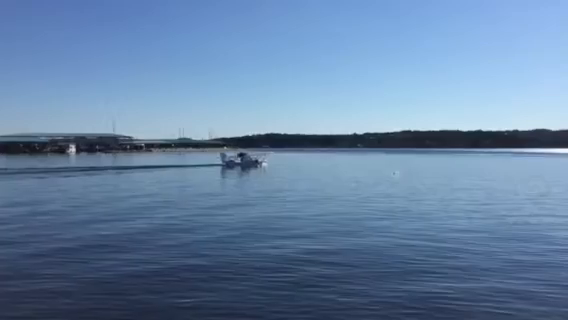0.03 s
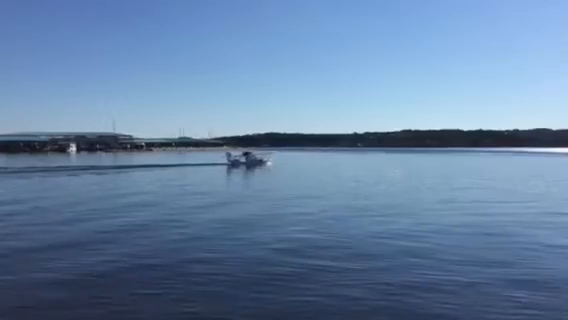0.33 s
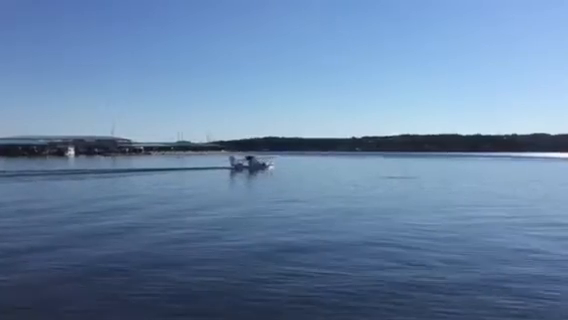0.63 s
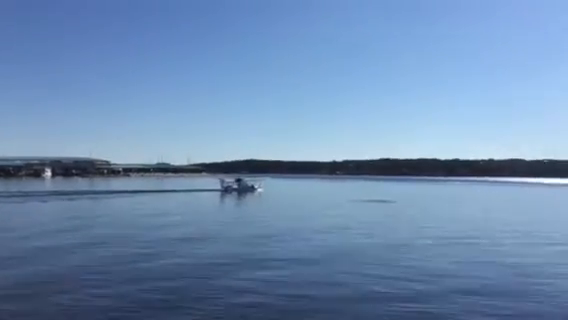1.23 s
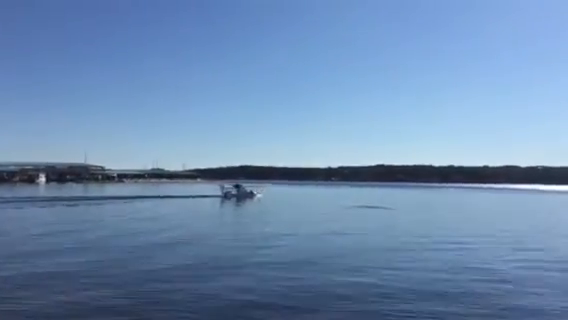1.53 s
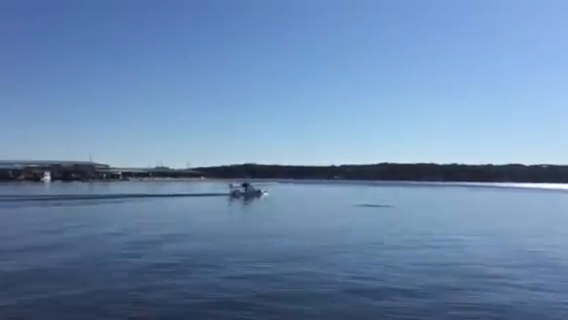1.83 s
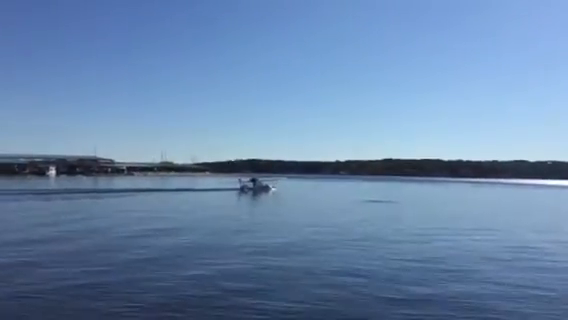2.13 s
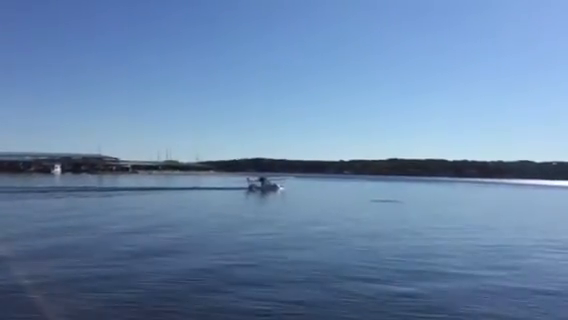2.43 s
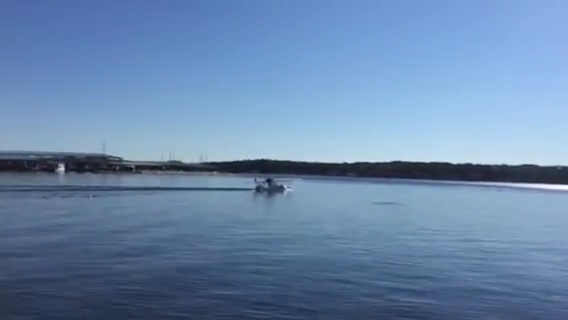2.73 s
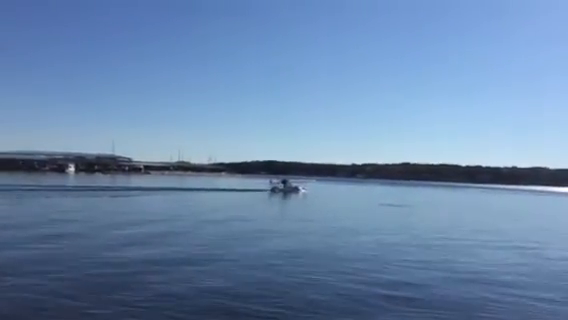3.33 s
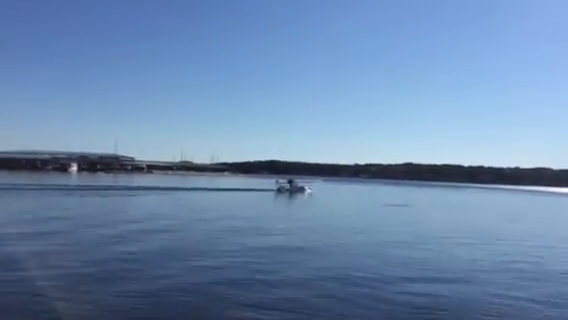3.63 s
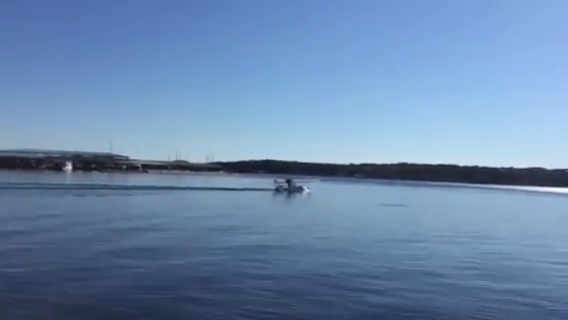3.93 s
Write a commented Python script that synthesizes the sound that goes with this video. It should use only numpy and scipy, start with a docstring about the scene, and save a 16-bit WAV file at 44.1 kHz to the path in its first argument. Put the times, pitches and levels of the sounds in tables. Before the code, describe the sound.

A distant seaplane taxis on open water for the whole four seconds, its low engine drone and raspy propeller buzz holding one pitch, with a faint metallic ring above. The buzz wavers in the air, swelling briefly near 0.9 seconds. Faint wind and water hiss continue underneath. Tiny nearby ticks come at about 0.2, 1.2 and 1.9 seconds, and soft low thuds around 0.9, 1.8 and 3.5 seconds.

```python
"""Seaplane on a lake

A small seaplane taxis far off at a steady speed. Its geared three-blade propeller snaps 48 times a
second, fading in and out through the moving air; the four-cylinder engine drones below it and its metal
parts ring above. Faint wind and water hiss lie underneath, with a few tiny ticks and soft thuds nearby."""
import sys
import numpy as np
from scipy import signal
from scipy.fft import rfft, irfft, next_fast_len
from scipy.io import wavfile
from scipy.ndimage import uniform_filter1d, map_coordinates

SR = 44100
rng = np.random.default_rng(int(sys.argv[2]) if len(sys.argv) > 2 else 0)


def digitize_waveform(pressure):
    """Quantize a signal to 16-bit integers and store it at the path in sys.argv[1].

    Rows of a 2-D input are taken as channels; values are limited to [-1, 1].
    """
    field = np.atleast_2d(pressure).T
    bounded = np.clip(field, -1, 1)
    quanta = np.round(bounded * 32767).astype(np.int16)
    wavfile.write(sys.argv[1], SR, quanta)


N = 176400
T = np.arange(N) / SR


def amp(db):
    """Decibels to amplitude ratio."""
    return 10 ** (np.asarray(db) / 20)


def unit(x):
    """Normalise to rms 1."""
    return x / np.sqrt(np.mean(x ** 2) + 1e-20)


def along(points, hz):
    """Interpolate (f/Hz, value) points on a logarithmic frequency axis."""
    f, v = np.transpose(points)
    return np.interp(np.log(hz + 1), np.log(f + 1), v)


def curves(rows):
    """Interpolate each column after t/s to one value per sample."""
    s, *cols = np.transpose(rows)
    return [np.interp(T, s, c) for c in cols]


def wobble(rate):
    """Smooth random modulation, rate knots a second."""
    return map_coordinates(rng.standard_normal(400), [T * rate + 2], mode="wrap")


def filtered(x, response):
    """Linear filtering: multiply the spectrum by a frequency response."""
    m = next_fast_len(N + SR // 2)
    return irfft(rfft(x, m) * response(np.fft.rfftfreq(m, 1 / SR)), m)[:N]


def coloured(x, spectrum):
    """Spectral shaping by (f/Hz, relative level/dB) points, at rms 1."""
    return unit(filtered(x, lambda hz: amp(along(spectrum, hz))))


def patchy(x, depth_db):
    """Random modulation: neighbouring frequencies swell and fade together."""
    spectra = signal.stft(x, nperseg=1024)[2]
    field = uniform_filter1d(rng.standard_normal(spectra.shape), size=5, axis=0)
    field = uniform_filter1d(field, size=9, axis=1)
    return signal.istft(spectra * amp(depth_db * unit(field)), nperseg=1024)[1][:N]


def passes(phase):
    """Times at which a phase completes a cycle."""
    return np.interp(np.arange(np.ceil(phase[0]), phase[-1]), phase, T)


def pulses(times, sizes):
    """A train of single-sample impulses."""
    return np.bincount(np.clip(np.round(times * SR).astype(int), 0, N - 1), sizes, N)


def tones(phase, table, waver_db, rate):
    """Harmonic series: partials crest loosely together, each wavering in level."""
    return sum(np.sqrt(2) * amp(db + waver_db * wobble(rate))
               * np.cos(2 * np.pi * (round(k) * phase + rng.normal(0, .17))) for k, db in table)


def blade_snaps(blade, spectrum):
    """Multipath: each blade's pulse arrives directly, off the water and as a later reflection."""
    times = passes(blade)
    jitter, scatter = rng.standard_normal((len(times), 2)).T
    times, sizes = times + .00005 * jitter, -amp(1.1 * scatter)
    bounce_s = .001 * (1 + .42 * np.interp(times, T, wobble(5)))
    echo_s = .0094 + .00015 * np.interp(times, T, wobble(4.4))
    reflections = pulses(times + bounce_s, .4 * sizes) + pulses(times + echo_s, .25 * sizes)
    snaps = coloured(pulses(times, sizes) + reflections, spectrum)
    smear_s_per_khz = .0013  # each snap becomes a short falling chirp
    return filtered(snaps, lambda hz: np.exp(1j * np.pi * smear_s_per_khz * (hz - 1000) ** 2 / 1000))


def blade_swish(blade, spectrum, decay_s=.0025):
    """Turbulence: the noise of torn air peaks at each blade passage."""
    from_blade_s = (blade - np.round(blade)) / (np.gradient(blade) * SR)
    return coloured(rng.standard_normal(N) * np.exp(-abs(from_blade_s) / decay_s), spectrum)


def fading(sound, depth=.9):
    """Atmospheric scintillation: moving air makes three bands fade separately."""
    # fading, scaled by depth (t/s, low level/dB, middle level/dB, high level/dB)
    band_levels = [(0.0, 2.0, -1.2, -0.3), (0.1, -4.4, -0.3, -1.3), (0.15, 1.6, -0.7, -1.2),
                   (0.31, -5.7, -2.9, -3.5), (0.48, 1.1, -2.6, -3.1), (0.56, -5.5, -1.2, -1.3),
                   (0.64, -1.3, 1.1, -2.6), (0.69, -1.4, -3.4, 0.8), (0.81, 2.5, 1.5, -2.8),
                   (0.85, -1.8, -2.8, 2.1), (0.89, 0.6, 5.6, 6.5), (0.98, -1.8, 3.4, -0.1),
                   (1.14, 2.9, -0.8, 0.3), (1.19, 4.5, 2.9, -1.3), (1.27, -1.3, -4.4, -0.0),
                   (1.44, 3.6, 2.4, -0.1), (1.52, -1.6, 0.1, -2.4), (1.64, 5.1, 2.8, -2.1),
                   (1.77, -0.7, -4.7, 0.0), (1.93, 3.4, 0.8, -0.3), (2.06, -0.7, -2.1, 2.0),
                   (2.1, -7.6, -2.9, 0.7), (2.35, 3.0, -0.8, 1.3), (2.39, 0.1, 2.0, 0.1),
                   (2.43, -2.5, -2.9, -3.8), (2.85, 0.5, 4.2, 2.9), (3.02, -2.0, -3.5, -0.1),
                   (3.1, 5.6, 1.5, -0.6), (3.27, -6.6, -4.5, -1.7), (3.35, -3.5, 4.5, 1.8),
                   (3.39, -2.8, -0.3, 4.1), (3.6, -1.7, 0.4, -2.4), (3.77, -2.1, -6.9, 0.2),
                   (3.81, 1.8, -1.7, -1.3), (3.89, -4.0, -5.0, -1.4), (4.0, -0.8, 6.0, -4.4)]
    low = filtered(sound, lambda hz: along([(650, 1), (900, 0)], hz))
    high = filtered(sound, lambda hz: along([(1250, 0), (1550, 1)], hz))
    bands = [low, sound - low - high, high]
    return sum(band * amp(depth * db) for band, db in zip(bands, curves(band_levels)))


def shore(x, t60_s=.45):
    """Reverberation: diffuse scatter from the water and the far shore decays exponentially."""
    tail = rng.standard_normal(SR) * amp(-60 * T[:SR] / t60_s)
    lead_in = x[:SR][::-1]  # the scatter is already sounding at the start
    return signal.fftconvolve(np.concatenate([lead_in, x]), tail / np.linalg.norm(tail))[SR:SR + N]


def propeller(turns, blades=3, gear_ratio=2.43):
    """Rotor noise: snaps, swish and hum repeat at the blade-passage frequency over a broadband wash."""
    # spectrum of a blade passage (f/Hz, relative level/dB)
    blade_spectrum = [(200, -26), (290, -1), (335, 2), (430, 0.5), (530, 4.5), (680, 3), (790, -9.5),
                      (900, 2.5), (1080, 3.5), (1380, -7.5), (1650, -2.5), (1850, -12), (2100, -13.5),
                      (2350, -24), (4000, -33), (8000, -60)]
    # spectrum of the steady wash (f/Hz, relative level/dB)
    wash_spectrum = [(20, -20), (200, -6), (400, -11), (600, -2), (800, -6), (1100, -0.5), (1400, -6.5),
                     (1650, -4), (1900, -14), (2100, -11), (2350, -26), (4000, -31), (8000, -70)]
    # hum partials (multiple of the blade rate, level/dB)
    hum_partials = [(1, -51.5), (2, -46), (3, -46), (4, -51), (5, -50), (6, -56), (7, -53)]
    blade = (turns - np.interp(.001, T, turns)) * blades / gear_ratio  # a blade passes at 1 ms
    snaps = amp(-41.5) * blade_snaps(blade, blade_spectrum)
    swish = amp(-50) * blade_swish(blade, blade_spectrum)
    wash = amp(-47.5) * coloured(rng.standard_normal(N), wash_spectrum)
    faded = fading(patchy(snaps + swish + wash, depth_db=1))
    scattered = amp(-9) * shore(faded)
    hum = -tones(blade - .03, hum_partials, waver_db=1.1, rate=3)  # lags by .03 blade periods
    return faded + scattered + hum


def ringing(turns, pattern_db, modes, repeat, decay_s=.012):
    """Resonance: two firings a turn rattle metal modes; a share, repeat, recurs each engine cycle."""
    times = passes(2 * turns)
    firings = pulses(times, amp(np.resize(pattern_db, len(times))))
    knocks = signal.fftconvolve(firings, np.exp(-T[:SR // 10] / decay_s))[:N]
    cycle_noise = rng.standard_normal(int(2 * N / turns[-1]))
    periodic = cycle_noise[(turns / 2 % 1 * len(cycle_noise)).astype(int)]
    rattle = knocks * (np.sqrt(repeat) * periodic + np.sqrt(1 - repeat) * rng.standard_normal(N))
    return unit(filtered(rattle, lambda hz: sum(
        amp(db) / (1 + (2 * (hz - centre) / width) ** 2) for centre, width, db in modes)))


def metal_parts(turns):
    """Structure-borne sound: firings ring the engine case and gears, and the gears whine."""
    # resonances (f/Hz, bandwidth/Hz, relative level/dB)
    case_modes = [(2575, 133, -7.5), (3141, 320, -0.5), (3300, 61, -7.5)]
    gear_modes = [(4065, 160, -5), (4270, 210, -21)]
    # knock at each firing (relative level/dB)
    case_knocks = [-9.5, -7, -11.5, -8.5]  # by cylinder
    gear_knocks = [1, -24, 1.5, -3.5, -2, -5.5, -1, -2.5]  # over two engine cycles
    # drift of the ringing (t/s, case level/dB, gear level/dB)
    ring_levels = [(0.0, 0.2, -1.0), (2.0, 1.9, -0.1), (2.16, -1.9, -0.8), (2.4, -0.8, 1.9),
                   (2.92, -0.6, 0.3), (3.4, -0.7, 2.7), (3.48, -1.6, -0.4), (4.0, -2.4, -0.7)]
    # gear whine (multiple of the crankshaft speed, level/dB)
    whine_partials = [(82, -61), (88, -68), (104, -66)]
    case_db, gear_db = curves(ring_levels)
    case = amp(-53.5 + case_db) * ringing(turns, case_knocks, case_modes, repeat=.5)
    gears = amp(-60 + gear_db) * ringing(turns, gear_knocks, gear_modes, repeat=.55)
    whine = amp(case_db) * tones(turns + .0012 * wobble(25), whine_partials, waver_db=3, rate=14)
    return case + gears + whine


def exhaust(turns, first_puff_s=.0056):
    """Periodic flow: exhaust puffs drone at harmonics of the two-turn engine cycle."""
    # drone partials (multiple of the cycle rate, level/dB)
    partials = [(4, -39.5), (5, -55), (6, -55.5), (7, -46.5), (8, -43), (9, -49), (10, -55), (11, -59),
                (12, -46), (13, -63), (16, -61), (24, -66)]
    # drift of the drone (t/s, relative level/dB)
    drone_level = [(0, 1.5), (.65, 1.5), (.95, -1), (4, 0.5)]
    cycle = (turns - np.interp(first_puff_s, T, turns)) / 2
    return amp(curves(drone_level)[0]) * tones(cycle, partials, waver_db=.5, rate=4)


def wind():
    """Broadband noise of wind and far water, amplitude-modulated by slight gusts."""
    # noise spectrum (f/Hz, relative level/dB)
    spectrum = [(15, -17), (35, -13), (70, -4), (150, 2.5), (250, -5.5), (400, -13.5), (900, -9),
                (1600, -18), (2300, -24), (3600, -21), (4800, -62), (9000, -65)]
    air = coloured(patchy(rng.standard_normal(N), depth_db=1.2), spectrum)
    return air * amp(-45.5 + .6 * wobble(4.2))


def water_hiss(fall_db_per_s=.84):
    """High-frequency noise of the water in slow exponential decay."""
    # noise spectrum (f/Hz, relative level/dB)
    spectrum = [(1500, -16), (3500, 11.5), (4800, -1.5), (5500, 0), (6600, 2), (7600, -1.5), (8200, 0.5),
                (9200, -5), (10300, -17), (11300, -14.5), (15000, -24)]
    hiss = coloured(patchy(rng.standard_normal(N), depth_db=1.5), spectrum)
    return hiss * amp(-58 - fall_db_per_s * (T - T.mean()))


def ticks_and_thuds():
    """Transients close by: bands of noise rise, then decay exponentially."""
    # tiny ticks and splashes; soft low thuds (t/s, level/dB, centre f/Hz, rise time/s)
    ticks = [(.08, -64, 6500, .06), (.166, -44, 5800, .002), (1.187, -51, 5200, .002),
             (1.938, -51, 5000, .003), (2.73, -69, 12500, .006), (3.705, -73, 13000, .014)]
    thuds = [(.81, -43, 170, .05), (.89, -45, 90, .018), (1.815, -41, 78, .014), (3.4, -45, 72, .018),
             (3.49, -41, 80, .012)]
    # spectrum of a burst (f/centre f, relative level/dB)
    shape = [(.5, -20), (.8, 14), (1.15, 3.5), (1.6, 0), (2.5, -36), (6, -90)]
    out = np.zeros(N)
    for start, db, hz, rise in [*ticks, *thuds]:
        noise = coloured(rng.standard_normal(N), [(hz * ratio, level) for ratio, level in shape])
        age = np.maximum(T - start, 0) / rise
        out += amp(db) * noise * age * np.exp(1 - age)
    return out


def scene():
    """Superposition: one crankshaft drives propeller and engine over the sounds of the lake."""
    # crankshaft speed (t/s, rotation f/Hz)
    crank_speed = [(0, 39.02), (.7, 38.98), (1, 38.88), (1.7, 38.97), (2.1, 38.94), (3.2, 38.92),
                   (3.7, 38.8), (4, 38.9)]
    turns = np.cumsum(curves(crank_speed)[0]) / SR
    seaplane = propeller(turns) + metal_parts(turns) + exhaust(turns)
    return (seaplane + wind() + water_hiss() + ticks_and_thuds())[None]


def record(dry, cutoff_hz=15300):
    """Band limiting: an ideal low-pass filter removes the highest treble."""
    return np.array([filtered(x, lambda hz: hz < cutoff_hz) for x in dry])


dry = scene()
out = record(dry)
digitize_waveform(out)
```